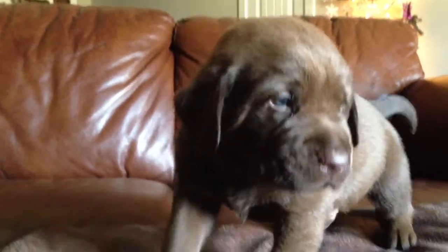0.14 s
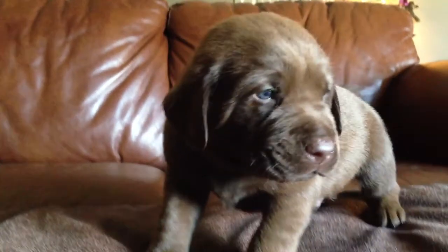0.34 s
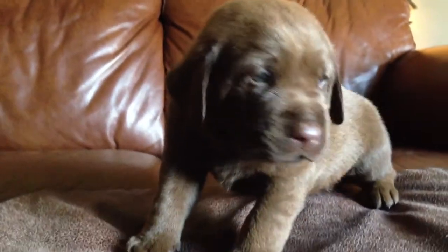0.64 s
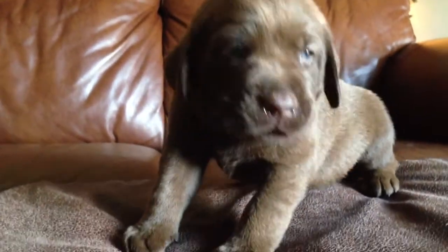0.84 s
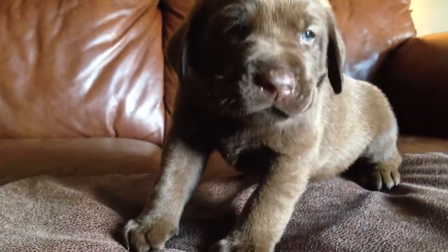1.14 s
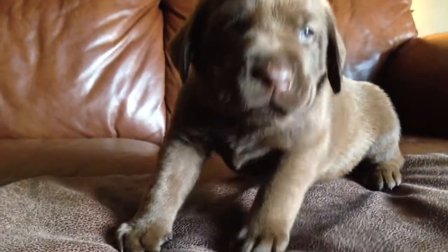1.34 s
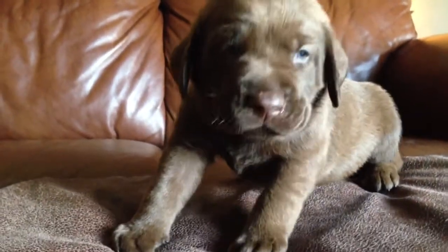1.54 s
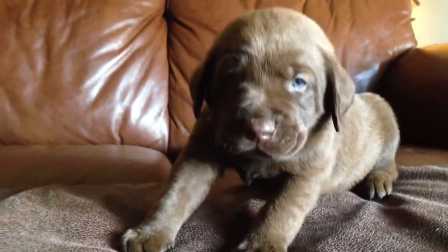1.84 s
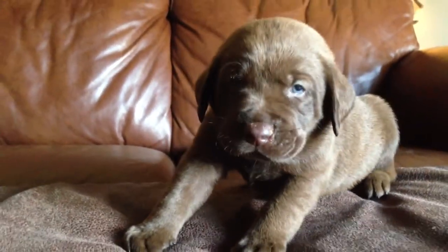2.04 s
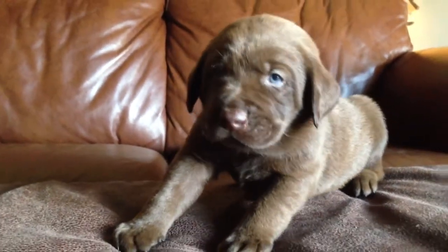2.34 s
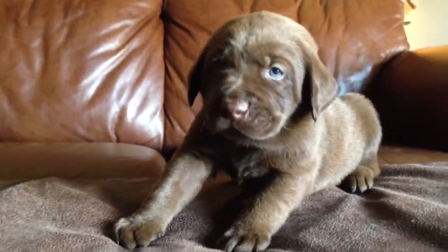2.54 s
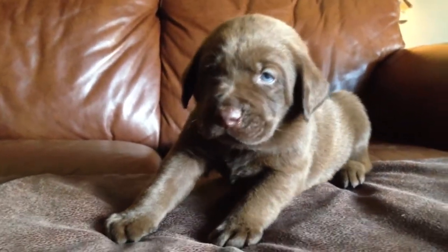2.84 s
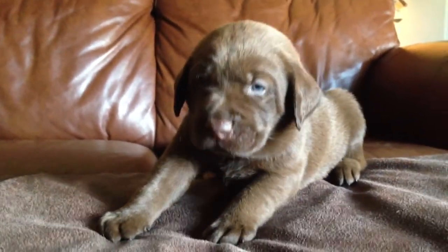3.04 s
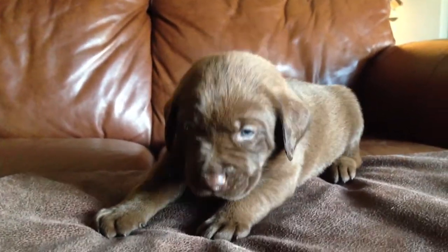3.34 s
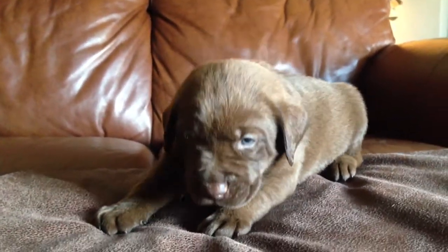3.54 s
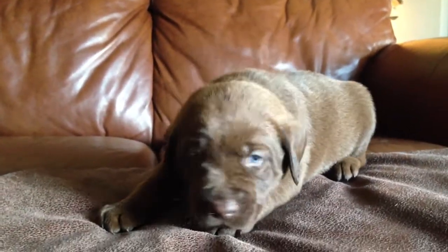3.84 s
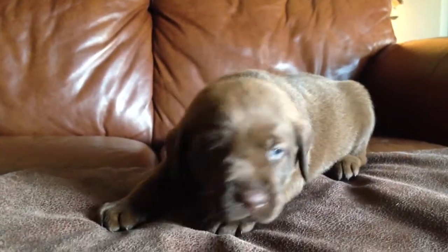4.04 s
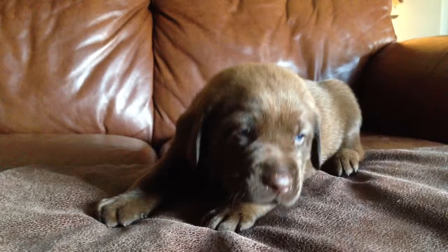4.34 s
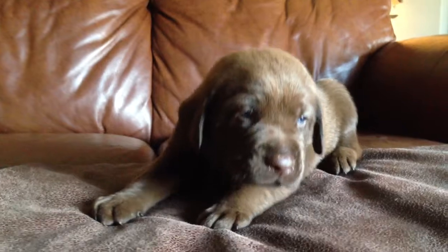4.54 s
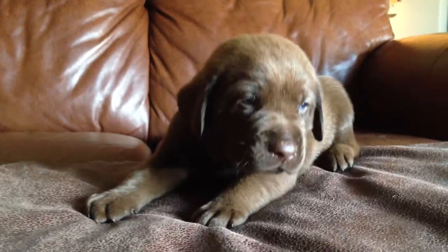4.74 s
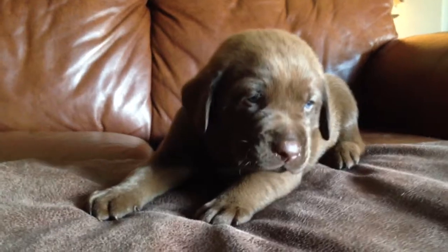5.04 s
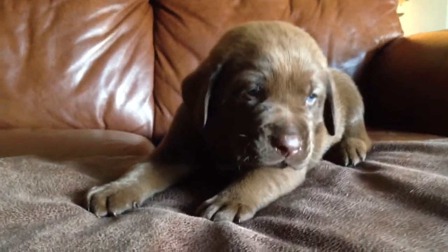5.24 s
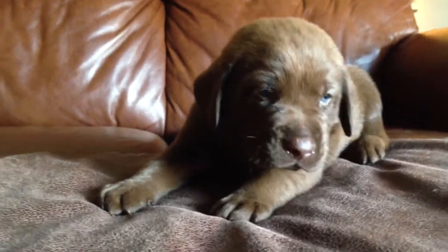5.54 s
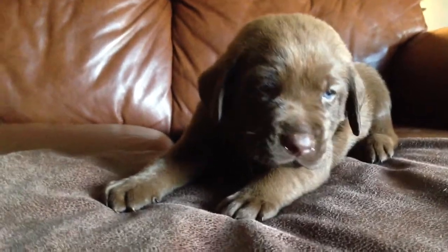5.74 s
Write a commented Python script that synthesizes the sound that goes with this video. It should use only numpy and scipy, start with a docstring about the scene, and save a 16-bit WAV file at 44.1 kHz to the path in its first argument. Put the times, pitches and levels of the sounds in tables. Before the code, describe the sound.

A small puppy cries close to the microphone on a leather couch. Two high whines come first, then a louder, longer one and a lower, wobbling, breaking one. After a near-silent pause, short nasal whimpers follow at intervals, the last three dropping into creaky moans. Faint whistles, soft paw pads and tiny lip clicks accompany it; a quiet room with faint hum and a thin, bass-light microphone.

```python
"""Soft room noise and a faint appliance hum come first; almost at once a young puppy cries on a couch, close by.
Four long sliding whines through the open mouth give way to short nasal whimpers, the last ones with low moans.
The voice is a train of vocal-fold pulses, heard through throat and nose with the open mouth's ring added
beside it; a slower flutter roughens it. A thin whistle tone and a hiss of shaped noise ride along.
Paws and lips are short puffs of noise; the couch and the room add delayed copies."""
import sys
import numpy as np
from scipy import signal
from scipy.fft import rfft, irfft, next_fast_len
from scipy.io import wavfile
from scipy.ndimage import uniform_filter1d

SR = 44100
rng = np.random.default_rng(int(sys.argv[2]) if len(sys.argv) > 2 else 0)


def bounce(signal):
    """Save signal as a 16-bit WAV file at the path given by the first command-line argument."""
    frames = np.transpose(np.atleast_2d(signal))
    limited = np.clip(frames, -1, 1)
    pcm = np.round(limited * 32767).astype(np.int16)
    wavfile.write(sys.argv[1], SR, pcm)


N = 260190  # length of the sound in samples


def gain_of(db):
    """Turns decibels into an amplitude factor."""
    return 10 ** (np.asarray(db) / 20)


def evened(x):
    """Scales a sound to an average strength (rms) of 1."""
    return x / np.sqrt(np.mean(x ** 2) + 1e-20)


def read(points, hz):
    """Reads a (frequency, value) table at any frequency, on a logarithmic axis."""
    table_hz, value = np.transpose(points)
    return np.interp(np.log(hz + 1), np.log(table_hz + 1), value)


def add(mix, start_s, sound):
    """Mixes a sound in at a given time."""
    part = mix[max(round(start_s * SR), 0):][:len(sound)]
    part += sound[:len(part)]


def coloured(x, points):
    """Makes each frequency louder or softer, as a (frequency, dB) table says."""
    size = next_fast_len(len(x) + 1024)
    spectrum = rfft(x, size)
    gain = gain_of(read(points, np.fft.rfftfreq(size, 1 / SR)))
    return irfft(spectrum * gain, size)[:len(x)]


def wander(hz):
    """A random wavering of rms 1, mostly slower than hz."""
    low_pass = signal.butter(2, hz, fs=SR, output="sos")
    return evened(signal.sosfilt(low_pass, rng.standard_normal(N)))


def span(start_s, end_s):
    """The sample numbers between two times, and the progress 0-1 through them."""
    at = np.arange(round(start_s * SR), min(round(end_s * SR), N))
    return at, np.linspace(0, 1, len(at))


def follow(rows):
    """The sample numbers that a curve table covers, and its columns read at each of them."""
    s, *columns = np.transpose(rows)
    at = np.arange(round(s[0] * SR), min(round(s[-1] * SR), N))
    return at, [np.interp(at / SR, s, column) for column in columns]


def fade(at, edge_s):
    """A loudness curve with a soft start and end."""
    to_nearest_end = np.minimum(at - at[0], at[-1] - at)
    return np.sin(np.pi / 2 * np.minimum(to_nearest_end / (edge_s * SR), 1)) ** 2


def amplitude(x, size=500):
    """Running strength (rms), smoothed over size samples, then over half as many."""
    power = uniform_filter1d(uniform_filter1d(x ** 2, size), size // 2)
    return np.sqrt(power + 1e-12)


# colour of the room noise: (frequency [Hz], level [dB per Hz])
ROOM_NOISE = [(30, 1), (60, -19), (100, -18), (130, -5), (200, 3), (330, -1), (480, -5.5), (600, -3.5),
              (800, 2), (1000, -7), (2000, -7.5), (4000, -9), (8000, -13), (15000, -20)]
ROOM_NOISE_DB, HUM_HZ, HUM_DB = -59.5, 239.5, -67


def background(drift_db=0.88, waver=0.003):
    """Coloured noise drifts slowly in level, beside a steady appliance tone that wavers slightly in pitch."""
    noise_gain = gain_of(ROOM_NOISE_DB + drift_db * wander(2.0))
    noise = noise_gain * evened(coloured(rng.standard_normal(N), ROOM_NOISE))
    hum_hz = HUM_HZ * (1 + waver * wander(8.8))
    hum = evened(np.sin(2 * np.pi * np.cumsum(hum_hz) / SR))
    return noise + gain_of(HUM_DB) * hum


# the whistle arches over the cries: (start [s], end [s], top pitch [Hz], level at the top [dB])
ARCHES = [(0.056, 0.086, 8240, -57.5), (0.472, 0.474, 8140, -44), (3.2, 3.275, 8530, -60.5),
          (3.485, 3.546, 9140, -73), (3.738, 3.79, 9100, -65), (3.965, 4.07, 9000, -69),
          (4.27, 4.457, 8300, -77), (4.68, 4.844, 8730, -62.5), (5.079, 5.205, 8600, -62.5),
          (5.598, 5.702, 8800, -65), (5.805, 5.863, 8630, -69)]
ARCH_DROP_HZ, ARCH_ENDS_DB = 400, 7  # each arch is lower and louder at both ends
# the whistle chirps downward as a cry lets go: (middle time [s], peak level [dB])
CHIRPS = [(0.322, -43), (0.773, -48), (1.509, -44), (3.271, -48), (3.553, -49.5), (3.793, -55), (4.08, -55),
          (4.462, -38.5), (4.849, -47), (5.358, -47.5), (5.871, -49.5)]
CHIRP_S, CHIRP_HZ, CHIRP_FALL_HZ_PER_S = 0.043, 7420, 28600  # length, pitch halfway, fall
CHIRP_FADE_DB = 33  # how much softer a chirp is at its ends


def whistles():
    """Every arch and chirp of the whistle as (samples, pitch Hz, amplitude dB)."""
    for start, end, top_hz, db in ARCHES:
        at, u = span(start, end)
        droop = (2 * u - 1) ** 2
        yield at, top_hz - ARCH_DROP_HZ * droop, db + ARCH_ENDS_DB * droop
    for middle, db in CHIRPS:
        at, u = span(middle - CHIRP_S / 2, middle + CHIRP_S / 2)
        hz = CHIRP_HZ - CHIRP_FALL_HZ_PER_S * (at / SR - middle)
        yield at, hz, db - CHIRP_FADE_DB * abs(2 * u - 1)


def whistle(jitter=0.0065, octave_db=-16):
    """A thin tone from the narrow gap between the folds, with a weak octave and a trembling pitch."""
    out, bend = np.zeros(N), 1 + jitter * wander(450)
    for at, hz, db in whistles():
        phase = 2 * np.pi * np.cumsum(hz * bend[at]) / SR
        tone = np.sin(phase) + gain_of(octave_db) * np.sin(2 * phase)
        out[at] += gain_of(db) * tone * fade(at, 0.0018)
    return out


# colour of the air through the nose: (frequency [Hz], level [dB per Hz])
NOSE_AIR = [(300, 1), (1400, -9), (2500, 5.5), (4000, -5), (6000, -8), (8500, -14.5), (10500, 3),
            (12500, -7.5), (15000, -6)]


def nose_hiss(whistle_db=-57, cry_db=-57.0, per_octave_db=10, flicker_db=2):
    """Air hisses through the nose with the whistle, and with the pressure that drives a high cry."""
    blown = np.zeros(N)
    for at, hz, *_ in cries():
        swell = np.sin(np.linspace(0, np.pi, len(at))) ** .5
        blown[at] = gain_of(cry_db + per_octave_db * np.log2(hz / 1400)) * swell  # higher cries blow harder
    for at, *_ in whistles():
        swell = np.sin(np.linspace(0, np.pi, len(at)))
        blown[at] = np.maximum(blown[at], gain_of(whistle_db) * swell)
    flicker = gain_of(flicker_db * wander(18))
    return blown * flicker * evened(coloured(rng.standard_normal(N), NOSE_AIR))


# the long whines, one curve each: (time [s], pitch [Hz], level [dB], ring of the open mouth [dB])
WHINES = [
    [(0.068, 1110, -37.5, -15), (0.078, 1095, -37.5, -6), (0.116, 1443, -31.5, -17),
     (0.138, 1420, -35.5, -21), (0.176, 1284, -32, -12), (0.276, 1052, -32.5, -13), (0.298, 970, -44, 9.5),
     (0.312, 844, -37, -4), (0.322, 820, -30.5, -41)],
    [(0.472, 1000, -34.5, -16), (0.484, 986, -42, 0.5), (0.506, 1170, -29.5, -8),
     (0.532, 1296, -29.5, -11.5), (0.578, 1185, -30.5, -8.5), (0.636, 1174, -28.5, -10.5),
     (0.708, 1106, -27, -11.5), (0.742, 1034, -30.5, -3.5), (0.772, 926, -38.5, -3.5)],
    [(0.921, 983, -31.5, -18), (0.933, 898, -36.5, 5.5), (0.979, 1165, -20, -18.5),
     (0.993, 1205, -22.5, -15.5), (1.021, 1051, -26.5, -15.5), (1.077, 1023, -30, -3),
     (1.157, 905.5, -34.5, 4.5), (1.273, 855, -29.5, -2), (1.351, 776.7, -28, -8.5),
     (1.451, 752.3, -24.5, -11), (1.471, 733, -23.5, -15), (1.491, 670, -22, -19), (1.499, 732, -25.5, -18),
     (1.508, 750, -34.5, -22)],
    [(1.676, 835, -33, -12), (1.692, 676, -28, -18.5), (1.702, 674, -28, -15.5), (1.722, 879, -31, -9.5),
     (1.736, 873, -35.5, -13), (1.768, 693, -25, -20), (1.802, 837.5, -29, -17), (1.828, 836, -33, -22),
     (1.854, 616.6, -25, -21), (1.9, 664.4, -25.5, -25.5), (1.928, 621, -28.5, -16.5),
     (1.956, 658, -28.5, -16), (1.966, 722, -27, -16), (2.012, 673.8, -25.5, -18), (2.294, 591.4, -28, -11),
     (2.308, 497, -32.5, -29), (2.316, 488, -33.5, -22), (2.332, 606, -27, -18.5),
     (2.37, 582.3, -27.5, -22), (2.402, 700, -36.5, -23), (2.434, 710, -38.5, -18), (2.446, 649, -41, -15)],
]
# a held-back voice is pressed, with a strong second harmonic: dB in each whine, and its loss per dB of level
WHINE_PRESS_DB, PRESS_LOSS = [3.2, 1.2, 0.37, 4.9], 0.033


def whines():
    """Long slides in pitch; the second harmonic weakens as a whine gets louder."""
    for rows, press_db in zip(WHINES, WHINE_PRESS_DB):
        at, (hz, db, open_db) = follow(rows)
        yield at, hz, db, open_db, press_db - PRESS_LOSS * (db - db.mean())


def cries():
    """Every cry as (samples, pitch Hz, level dB, open mouth dB, pressed second harmonic dB)."""
    yield from whines()
    yield from whimpers()
    yield from moans()


# a whine catches as it starts and as it stops: length [s], depth [0-1], flutter [Hz]
CATCH_IN, CATCH_OUT = (0.011, 0.35, 300), (0.021, 0.19, 178)
# where the voice breaks in mid cry: (start [s], end [s], depth [0-1], flutter [Hz])
BREAKS = [(1.34, 1.486, 0.03, 139.8), (1.68, 1.72, 0.67, 139.2), (1.748, 1.782, 0.66, 122.2),
          (1.917, 1.945, 0.78, 138.9), (1.951, 1.985, 0.45, 131), (2.227, 2.247, 0.38, 88.6),
          (4.442, 4.456, 0.42, 518.9)]
# how unsteady the flutter rate is, as a share: whines and creaks tear, a whimper rattles more evenly
TEAR_UNSTEADY, RATTLE_UNSTEADY = 0.212, 0.1106
ONSET_FLUTTER_HZ, CREAK_DEPTH = 135, 1  # flutter as a whimper starts; depth as a moan ends


def rough_spells():
    """Every stretch of flutter as (start s, end s, depth, first Hz, last Hz, unsteadiness)."""
    (in_s, in_depth, in_hz), (out_s, out_depth, out_hz) = CATCH_IN, CATCH_OUT
    for rows in WHINES:
        start, end = rows[0][0], rows[-1][0]
        yield start, start + in_s, in_depth, in_hz, in_hz, TEAR_UNSTEADY
        yield end - out_s, end, out_depth, out_hz, out_hz, TEAR_UNSTEADY
    for start, end, depth, hz in BREAKS:
        yield start, end, depth, hz, hz, TEAR_UNSTEADY
    for start, *_, rough_s, depth, final_hz in WHIMPERS:
        if depth > 0:
            yield start, start + rough_s, depth, ONSET_FLUTTER_HZ, final_hz, RATTLE_UNSTEADY
    for _, end, *_, creak_s, hz in MOANS:
        yield end - creak_s, end, CREAK_DEPTH, hz, hz, TEAR_UNSTEADY


def flutter(speed_up_power=1.15, weaken_power=0.34):
    """A second, slower vibration of the folds that weakens as it speeds up: its depth and its phase."""
    depth, beat, drift = np.zeros(N), np.zeros(N), wander(131.0)
    for start, end, strength, first_hz, last_hz, unsteady in rough_spells():
        at, u = span(start, end)
        hz = first_hz * (last_hz / first_hz) ** (u ** speed_up_power)
        depth[at] = np.minimum(strength * (first_hz / hz) ** weaken_power, 1)
        beat[at] = 2 * np.pi * hz * (1 + unsteady * drift[at]) / SR
    return uniform_filter1d(depth, size=130), np.cumsum(beat)


# how sharply the folds snap shut, which lifts the high overtones: (time [s], level [dB])
SNAP = [(.2, 7.5), (.6, -7), (1.2, -6), (2.1, 0), (4.4, 1), (5.5, 10.5)]


def fold_pulses(at, hz, phase, press_db, closure_hz=13500):
    """The vocal folds open and shut: a basic tone, a pressed second harmonic and a stack of overtones."""
    folds = np.cos(phase) + gain_of(press_db) * np.sin(2 * phase) / 2
    snap = gain_of(np.interp(at / SR, *np.transpose(SNAP)))
    for k in range(3, 22):
        soft_closure = 1 + (k * hz / closure_hz) ** 4  # rounds off the top overtones
        folds += snap * np.cos(k * phase - (k - 1) * np.pi / 2) / k / soft_closure
    return folds


# what the open mouth adds, with its resonance at MOUTH_HZ: (frequency [Hz], level [dB])
MOUTH = [(1500, -81), (2400, -29.5), (3050, -6), (3600, -6.5), (4450, 8.5), (5100, 3.5), (6000, -7.5),
         (7000, -13), (8500, -28), (15000, -36)]
MOUTH_HZ = 4450
# the jaw and lips move that resonance: (time [s], resonance [Hz])
JAW = [(.1, 3620), (.3, 4160), (.55, 4340), (.76, 4350), (.94, 4430), (1.15, 4430), (1.27, 4440),
       (1.48, 4290), (1.75, 4840), (2, 4710), (2.4, 4720), (4.4, 3988), (5.25, 3527)]


def mouth(x, at):
    """The mouth's resonances slide together with the jaw."""
    hz, t, z = signal.stft(x, SR, nperseg=256)
    peak_hz = np.interp(at[0] / SR + t, *np.transpose(JAW))
    gain = gain_of(read(MOUTH, hz[:, None] * MOUTH_HZ / peak_hz))
    return signal.istft(z * gain, SR, nperseg=256)[1][:len(x)]


# colour of the voice through throat and nose: (frequency [Hz], level [dB])
THROAT_NOSE = [(100, -41), (200, -10.5), (420, -1.5), (650, 9.5), (950, -1.5), (1450, 5.5), (1750, -1),
               (2050, -8.5), (2500, -25.5), (4200, -36.5), (6000, -28.5), (8000, -17.5), (10500, -17.5),
               (15000, -18)]
# turbulence at the folds, against the pulses: (frequency [Hz], level [dB])
RASP = [(1000, -68), (4000, -33), (7000, -18), (10000, -41), (15000, -11.5)]


def voice(jitter=0.0018, swing=0.16, chaos=0.087, puff=0.56, shimmer_db=0.91, edge_s=0.0032):
    """Fold pulses, shaken by the flutter, sound through throat and nose; the open mouth's ring is added."""
    nasal, oral, (depth, beat) = np.zeros(N), np.zeros(N), flutter()
    # the pitch trembles a little always, and swings with the flutter
    bend = 1 + jitter * wander(670) + depth * (swing * np.sin(beat) + chaos * wander(343))
    grip = 1 - depth * ((1 + np.cos(beat)) / 2) ** 2  # each flutter cycle chokes the folds briefly
    shimmer = gain_of(shimmer_db * wander(48))  # small random changes of loudness
    turbulence = coloured(rng.standard_normal(N), RASP)
    for at, hz, level_db, open_db, press_db in cries():
        phase = 2 * np.pi * np.cumsum(hz * bend[at]) / SR
        folds = fold_pulses(at, hz, phase, press_db)
        # the mean air flow is chopped too, which fills in the low end
        chopped = grip[at] * (folds + puff) - puff
        flow = chopped + (1 + np.cos(phase)) * turbulence[at]
        effort = gain_of(level_db) * shimmer[at] * fade(at, edge_s)
        # dividing by the running strength lets the level curve set the loudness
        nasal[at] += effort * flow / amplitude(coloured(flow, THROAT_NOSE))
        ring = mouth(flow, at)
        oral[at] += effort * gain_of(open_db) * ring / amplitude(ring)
    return coloured(nasal, THROAT_NOSE) + oral


def leather(x, count=7):
    """Treble glances off the couch within a few ms, so gliding overtones swell and fade."""
    glances = np.zeros(SR // 150)
    delays = rng.integers(SR // 1000, len(glances), count)
    glances[delays] = rng.choice([-1., 1.], count) / np.sqrt(count)
    return coloured(signal.fftconvolve(x, glances)[:N], [(1500, -30), (3000, -12), (8000, -6)])


# how long the echo takes to fall by 60 dB: (frequency [Hz], fall time [s])
ECHO_FALL = [(300, 0.4), (800, 0.3245), (2000, 0.72), (5500, 0.36), (12000, 1.7)]
# the colour of the echo: (frequency [Hz], level [dB])
ECHO_COLOUR = [(200, -5), (750, -8), (1400, -16.5), (4500, -10.5), (12000, -20.5)]


def room(x, gap_s=0.0087):
    """Scattered reflections follow after a short gap; each frequency dies away at its own speed."""
    size = SR // 2
    reflections = rng.choice([-1., 1.], size) * (rng.random(size) < .05)
    hz, t, z = signal.stft(reflections, SR, nperseg=256)
    decay = gain_of(-60 * t / read(ECHO_FALL, hz)[:, None])
    tail = signal.istft(z * decay, SR, nperseg=256)[1]
    tail *= np.arange(len(tail)) > gap_s * SR
    return coloured(signal.fftconvolve(x, tail / np.linalg.norm(tail))[:N], ECHO_COLOUR)


def taps(rows, colour, rise_s, lift_db):
    """Short puffs of noise that swell and die, coloured by what is touched."""
    out, u = np.zeros(N), np.arange(SR // 5) / SR / rise_s
    for s, db in rows:
        puff = u * np.exp(1 - u) * rng.standard_normal(len(u))
        push = coloured(np.pad(puff, SR // 20), colour)  # silence around it leaves room for the filter
        add(out, s - rise_s / 2 - 1 / 20, gain_of(db + lift_db) * push / abs(push).max())
    return out


# paws on the cushion: (time [s], peak level before the lift [dB])
PAWS = [(0.355, -48.5), (0.864, -46.5), (1.383, -46), (1.571, -48)]


def paws():
    """Paws pad on the cushion: dull puffs, strongest around 180 Hz."""
    colour = [(40, -32), (90, -24), (130, -11), (180, -5.5), (300, -18), (1000, -27.0), (6000, -46)]
    return taps(PAWS, colour, rise_s=0.009, lift_db=6.5)


# wet clicks of the lips: (time [s], peak level before the lift [dB])
LIPS = [(1.564, -48), (2.5194, -54.5), (5.2463, -50)]


def lips():
    """Wet lips click: very short, bright puffs, strongest around 7000 Hz."""
    return taps(LIPS, [(1000, -20), (4000, 1), (7000, 7), (15000, -5)], rise_s=0.00051, lift_db=9.0)


# short nasal whimpers: (start [s], end [s], pitch [Hz], final pitch [Hz], level [dB], swell [dB],
# open mouth [dB], rough for [s], roughness [depth, held to 1 at most], final flutter [Hz])
WHIMPERS = [ (1.659, 1.677, 1240, 1200, -37.5, 2, -15, 0, 0, -1),
            (2.765, 2.774, 574, 715, -47.5, 0, -32, 0, 0.01, 0),
            (2.88, 2.92, 957, 520, -49, 26, -23, 0, 0, 0),
            (3.207, 3.261, 1444, 1335, -34, 4.5, -32, 0.046, 0.92, 290.5),
            (3.470, 3.524, 1417, 1324, -33, 5, -27, 0.053, 0.7, 696),
            (3.745, 3.786, 1112, 770, -36, 8, -17.5, 0.038, 1.22, 190.5),
            (3.967, 4.074, 1303, 1113, -29, -4, -31.5, 0.057, 0.92, 601.5),
            (4.267, 4.457, 1483, 1170, -27, 0, -33.5, 0.046, 0.46, 449.5),
            (4.663, 4.76, 1420, 1354, -31, 1.5, -62, 0.1, 0.63, 399.5),
            (5.085, 5.191, 1337, 1130, -34.5, 5, -38, 0.105, 1.03, 301),
            (5.606, 5.703, 1344, 1076, -33.5, 4, -31.5, 0.095, 1.04, 300.5), ]
SAG_POWER, ARCH_DB, WHIMPER_PRESS_DB = 4.0, 3.2, 3.5


def whimpers():
    """Short cries mostly through the nose: the pitch holds, then moves late; the level arches."""
    for start, end, hz, final_hz, db, swell_db, open_db, *_ in WHIMPERS:
        at, u = span(start, end)
        sag = u ** SAG_POWER
        level_db = db + swell_db * sag - ARCH_DB * (2 * u - 1) ** 2
        yield at, hz + (final_hz - hz) * sag, level_db, open_db, WHIMPER_PRESS_DB


# the last whimpers crack down into a moan that ends in a creak: (start [s], end [s], settled pitch [Hz],
# level [dB], swell [dB], pressed second harmonic halfway [dB], creak for [s], creak flutter [Hz])
MOANS = [(4.758, 4.84, 621.3, -34, -2.5, 17, 0.088, 310), (5.193, 5.353, 804.5, -36.5, 4.5, 9, 0.023, 168),
         (5.705, 5.861, 766, -35, 0.5, 6.5, 0.064, 187)]
MOAN_OVERSHOOT, MOAN_SETTLE_S, MOAN_MOUTH_DB = 0.11, 0.028, -26
MOAN_RELAX_DB = 7.5  # the second harmonic weakens by this from start to end


def moans():
    """Low cries that start a little sharp and settle, while the pressed voice relaxes."""
    for start, end, hz, db, swell_db, press_db, *_ in MOANS:
        at, u = span(start, end)
        settle = 1 + MOAN_OVERSHOOT * np.exp(-(at - at[0]) / SR / MOAN_SETTLE_S)
        level_db = db + swell_db * (u - .5)
        yield at, hz * settle, level_db, MOAN_MOUTH_DB, press_db - MOAN_RELAX_DB * (u - .5)


def scene():
    """The puppy and its small movements, with the couch, the room and the background."""
    puppy = voice() + whistle() + nose_hiss() + paws() + lips()
    return (puppy + leather(puppy) + room(puppy) + background())[None]


EDGE_HZ = 15450  # upper limit of the treble


def record(dry, low_cut_hz=100):
    """The small microphone loses the bass; then the treble is cut off above the edge."""
    bass_cut = signal.butter(3, low_cut_hz, "highpass", fs=SR, output="sos")
    thin = signal.sosfilt(bass_cut, dry)
    treble_cut = signal.firwin(511, EDGE_HZ, window=("kaiser", 9), fs=SR)
    return signal.oaconvolve(thin, treble_cut[None], "same")


dry = scene()
out = record(dry)
bounce(out)
```